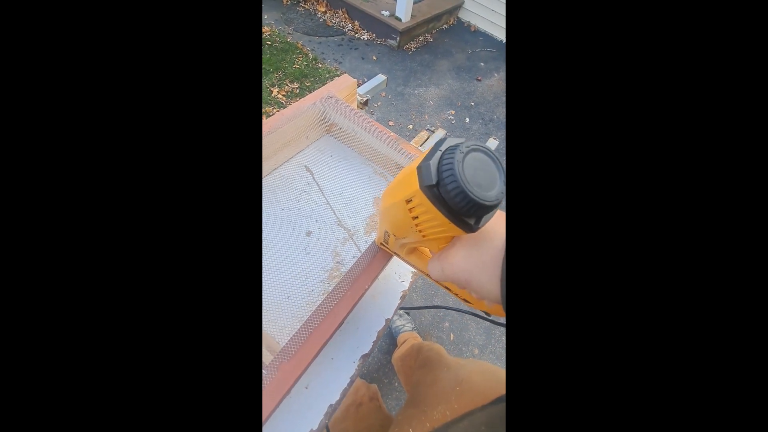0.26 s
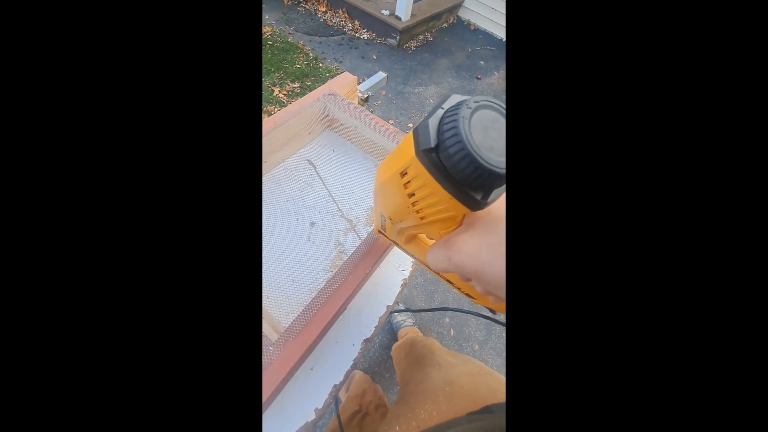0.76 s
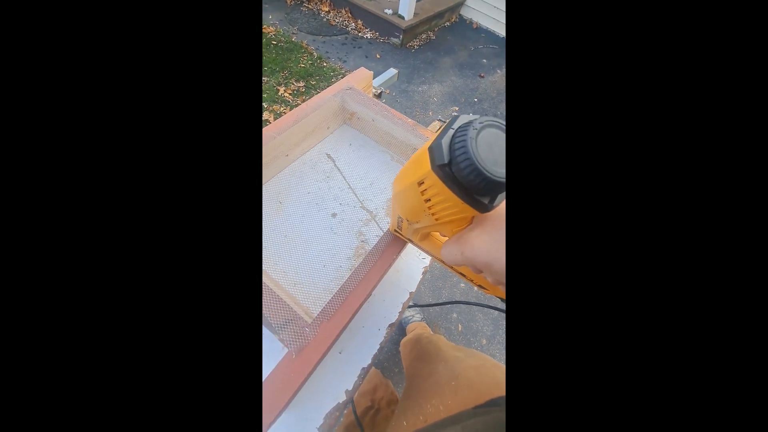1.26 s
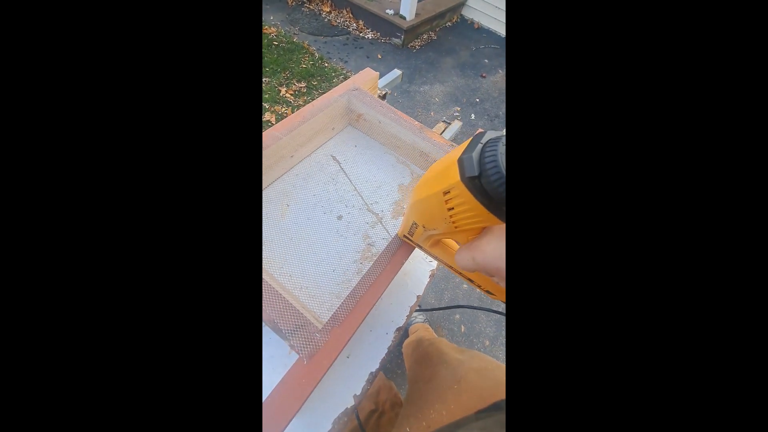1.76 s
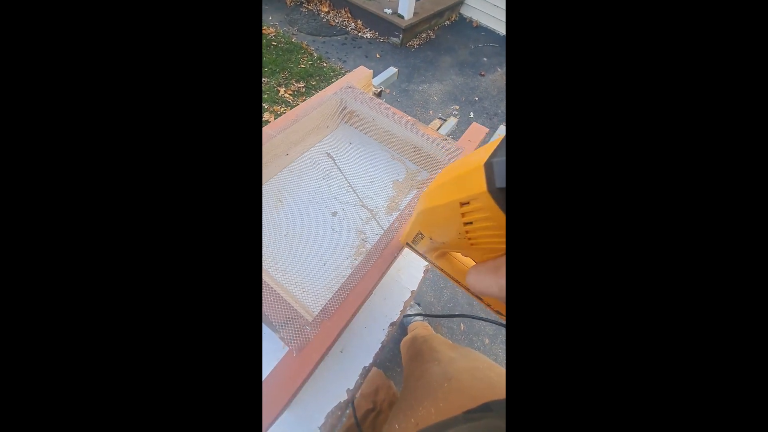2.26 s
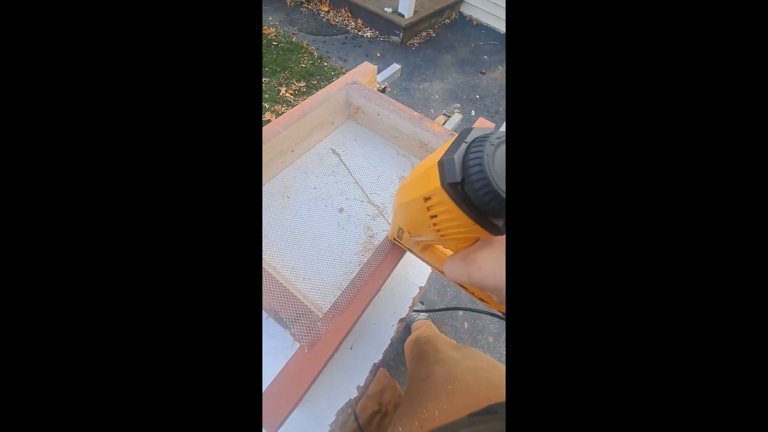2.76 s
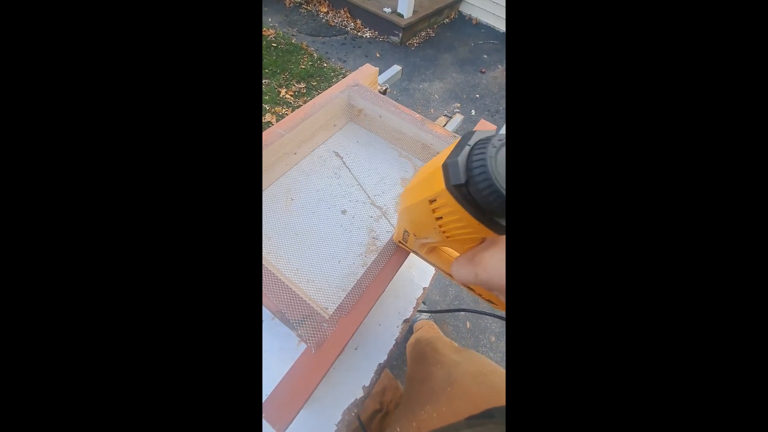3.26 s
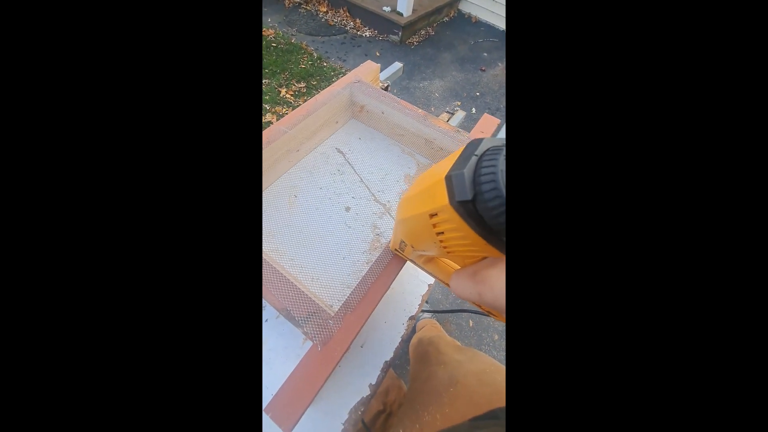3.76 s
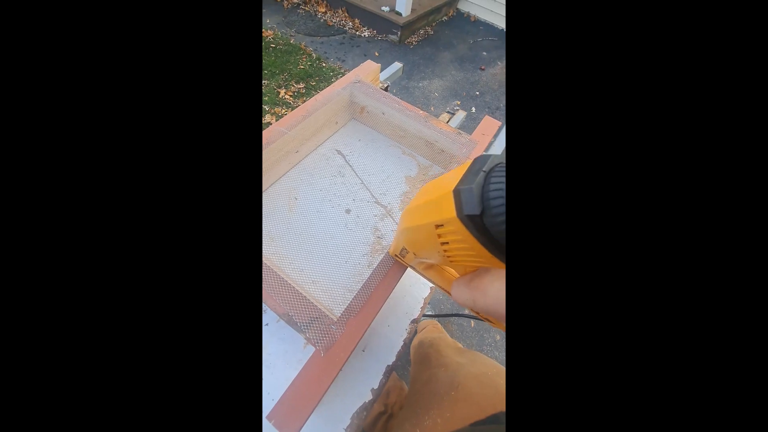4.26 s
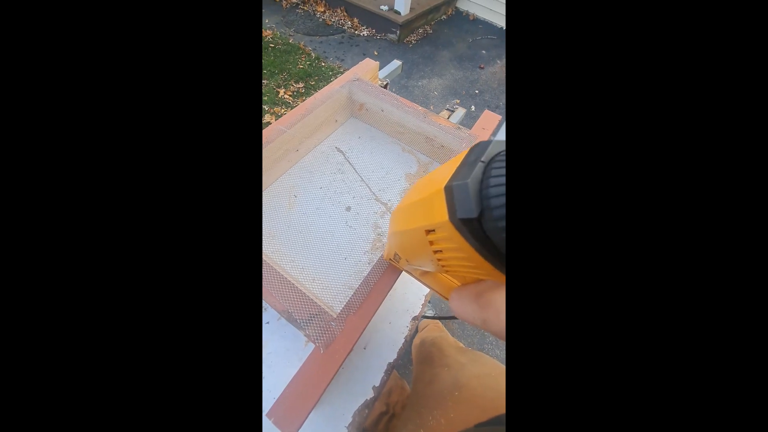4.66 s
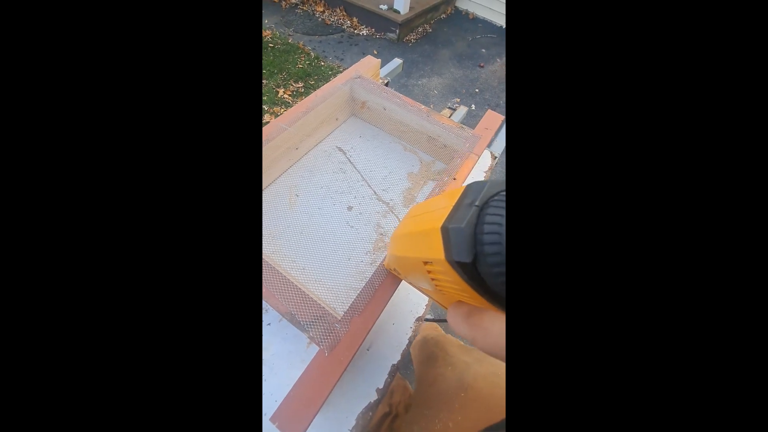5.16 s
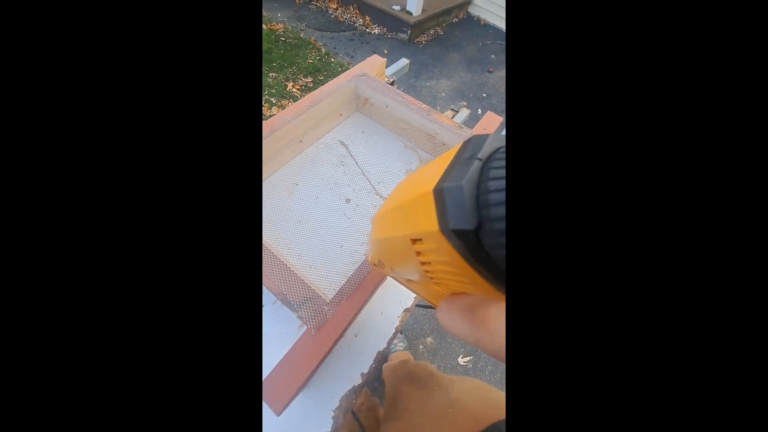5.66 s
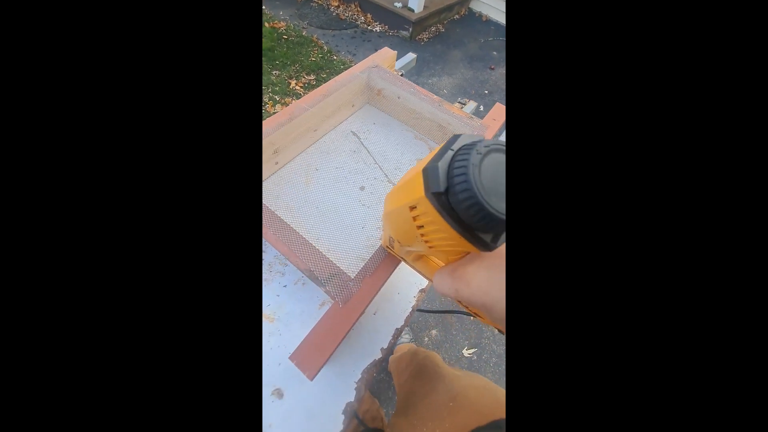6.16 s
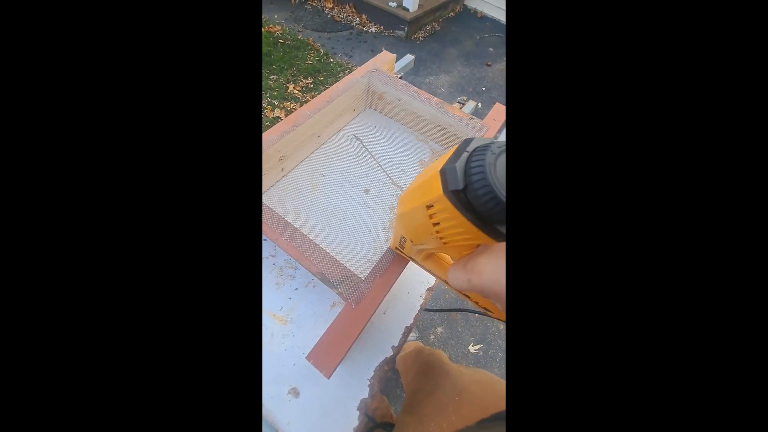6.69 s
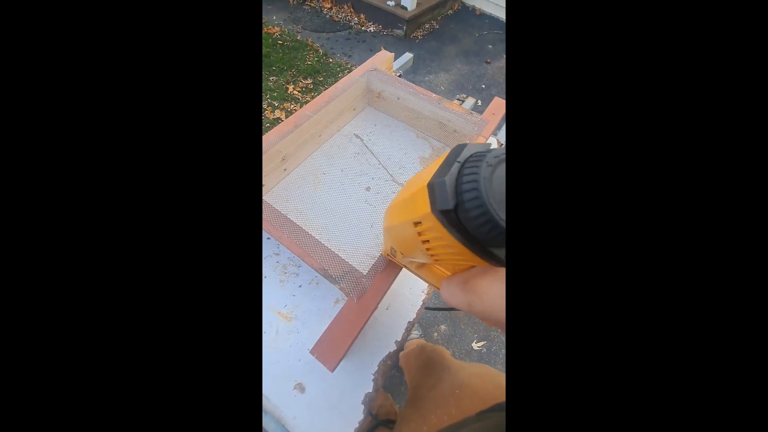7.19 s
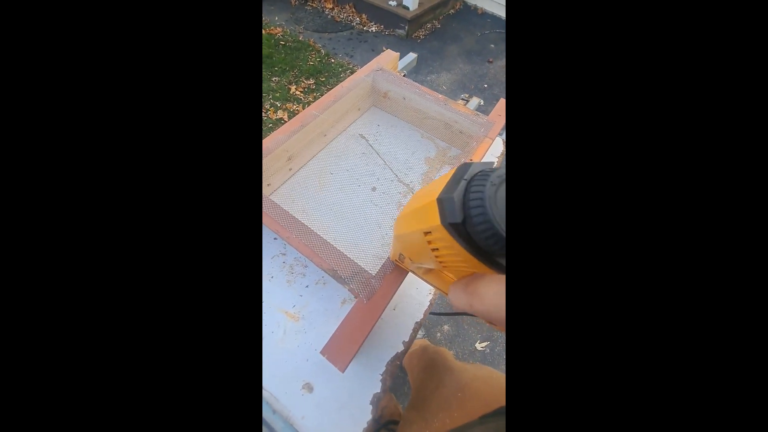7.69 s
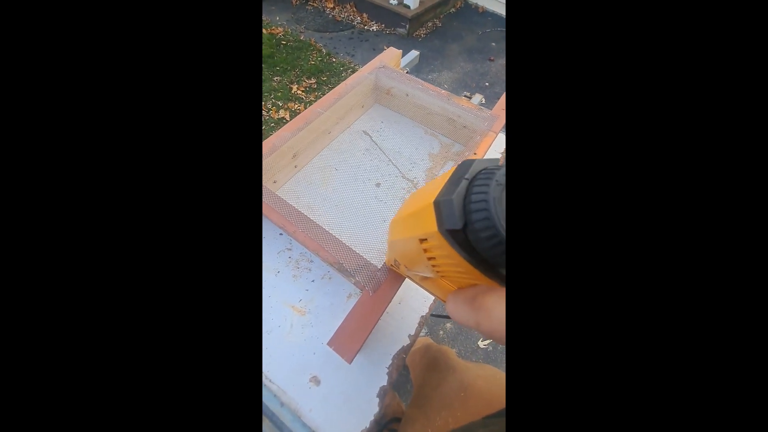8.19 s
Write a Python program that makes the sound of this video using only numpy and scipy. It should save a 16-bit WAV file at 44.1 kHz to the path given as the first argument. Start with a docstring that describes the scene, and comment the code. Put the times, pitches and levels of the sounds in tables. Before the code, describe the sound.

Seven loud metallic staple shots into wood, with small clicks, hollow bouncing thuds and a short outdoor echo.

```python
"""Outdoors, on a folding table, an electric stapler fires seven times into a wooden frame.
Each time its plunger (the rod that pushes the staple) speeds up, drives the staple, slams back and
bounces twice, and its spring hisses on. The frame booms, jumps and thuds back down; house walls echo.
Trigger ticks, the tool rubbing on wire mesh and a low outdoor drone fill the gaps."""
import sys
import numpy as np
from scipy import signal
from scipy.fft import rfft, irfft, next_fast_len
from scipy.io import wavfile
from scipy.ndimage import uniform_filter1d, map_coordinates

SR = 44100
rng = np.random.default_rng(int(sys.argv[2]) if len(sys.argv) > 2 else 0)


def master_out(mix):
    """Clip the mix to full scale and print it as 16-bit PCM to the path in sys.argv[1]."""
    frames = np.transpose(np.atleast_2d(mix))
    ceiling = np.clip(frames, -1, 1)
    pcm = np.round(ceiling * 32767).astype(np.int16)
    wavfile.write(sys.argv[1], SR, pcm)


N = 371763

# each staple driven in: t/s, steel level/dB, boom level/dB, wait until the second rebound/ms
SHOTS = [(0.3425, -1.5, -4, 37.2), (1.8081, -1.5, -3.5, 40.3), (3.1076, -1.95, -5, 38),
         (4.2072, -0.63, -1.5, 38.3), (5.2563, -1.5, -5, 37.4), (6.6063, -3, -3, 38.6),
         (7.6217, -2.5, -5, 37.9)]
FIRST_REBOUND_S = 0.0113  # after the staple is driven


def amp(db):
    """Turns decibels into a factor to multiply by."""
    return 10 ** (np.asarray(db) / 20)


def unit(x):
    """Scales a signal to an average power of 1."""
    return x / np.sqrt(np.mean(x ** 2) + 1e-20)


def along(points, hz):
    """Reads a curve through (frequency, value) points, with octaves evenly spaced."""
    f, v = np.transpose(points)
    return np.interp(np.log(hz + 1), np.log(f + 1), v)


def curve(points):
    """Turns (frequency, decibels) points into a function that gives the gain at any frequency."""
    return lambda hz: amp(along(points, hz))


def filtered(x, response):
    """Multiplies each frequency in x by response(frequency)."""
    size = next_fast_len(x.shape[-1] + 8192)
    hz = np.fft.rfftfreq(size, 1 / SR)
    return irfft(rfft(x, size) * response(hz), size)[..., :x.shape[-1]]


def add(track, s, sound):
    """Mixes a sound into a track, starting at s seconds."""
    part = track[..., max(round(s * SR), 0):][..., :sound.shape[-1]]
    part += sound[..., :part.shape[-1]]


def wobble(rate):
    """A smooth curve through `rate` random values a second."""
    return map_coordinates(rng.standard_normal(int(N * rate / SR) + 4), [np.arange(N) * rate / SR])


def rush(gain, patchy_db):
    """Stereo noise shaped by gain(frequency), with random louder and softer patches."""
    # how alike left and right are: f/Hz, likeness (1 = the same)
    likeness = [(60, 0.82), (180, 1), (550, -0.063), (1650, -0.33), (4970, -0.39), (15000, 0.99)]
    spectrum = signal.stft(rng.standard_normal((2, N)), nperseg=512)[2]
    patches = uniform_filter1d(rng.standard_normal(spectrum.shape[1:]), 4, axis=0)
    patches = uniform_filter1d(patches, 8, axis=1)
    pair = signal.istft(spectrum * amp(patchy_db * unit(patches)), nperseg=512)[1][:, :N]
    turn = lambda hz: np.arccos(np.clip(along(likeness, hz), -1, 1)) / 2
    mid, side = filtered(pair, lambda hz: gain(hz) * [np.cos(turn(hz)), np.sin(turn(hz))])
    return unit(np.array([mid + side, mid - side]))


def shot_swell(peak_db, rise_s, fade_db_per_s):
    """A gain that swells after every shot and fades."""
    after = np.arange(N) / SR - np.array(SHOTS)[:, :1]
    rising = np.clip(after / rise_s, 0, 1) ** 2
    fading = amp(peak_db - fade_db_per_s * np.clip(after - rise_s, 0, None))
    return (rising * fading).sum(axis=0)


def background():
    """A rumble, a drone with a brighter upper edge, and fuzzy tones that swell with the drone."""
    # loudness between shots: t/s, rumble level/dB, drone level/dB, edge level/dB
    band_levels = [(0.0, -50, -68.5, -83), (0.3, -61, -60, -82.5), (1.1, -64.5, -67.5, -90.5),
                   (1.31, -60, -63, -83.5), (1.8, -59.5, -61.5, -82), (2.44, -65, -69, -80.5),
                   (2.77, -71.5, -68, -79), (3.54, -75, -73, -89), (4.0, -61, -71, -79.5),
                   (4.67, -63, -67.5, -78), (5.261, -57.5, -69.5, -80.5), (5.84, -72, -68, -77),
                   (6.57, -65, -63, -76.5), (7.068, -69, -75.5, -95.5), (7.39, -69, -71.5, -91.5),
                   (7.63, -60, -67, -80.5), (8.05, -68.5, -83, -100.5), (8.43, -67, -73, -93.5)]
    # swell of these three bands after a shot: peak level/dB, rise/s, fade/(dB per s)
    swells = [(-47, .2, 90), (-53.5, 0.12, 58), (-69, 0.095, 69.5)]
    # tone colour of each band: f/Hz, level/dB
    rumble_colour = [(12, -48.5), (20, -29), (43, 4.5), (86, -16), (134, -4.5), (226, -16.5), (300, -21),
                     (390, -51.5), (660, -120)]
    drone_colour = [(120, -27), (200, -1), (300, -14.5), (345, -3.5), (416, -3), (437, -5.5), (695, -3),
                    (1400, -18.5), (1820, -53), (3080, -120)]
    edge_colour = [(900, -39), (1200, -1), (1700, -4.5), (2300, -6), (2600, -30.5), (4000, -59.5)]
    # wavering tones in the drone: f/Hz, half-width/Hz, level/dB
    hum_tones = [(462, 20, -2.5), (738, 2, -1), (1500, 1, -16)]
    t = np.arange(N) / SR
    times, *levels = np.transpose(band_levels)
    low, mid, high = (amp(np.interp(t, times, db)) + shot_swell(*row) for db, row in zip(levels, swells))
    rumble = low * amp(2.4 * wobble(5.8)) * rush(curve(rumble_colour), patchy_db=0)
    drone = mid * amp(2.4 * wobble(6.7)) * rush(curve(drone_colour), patchy_db=2.5)
    edge = high * rush(curve(edge_colour), patchy_db=1.9)
    tones = lambda hz: sum(amp(db) / (1 + ((hz - pitch) / width) ** 2) for pitch, width, db in hum_tones)
    hum = mid ** 0.86 * amp(-19 + 2 * wobble(1.5)) * rush(tones, patchy_db=0)
    return rumble + drone + edge + hum


def microphone_hiss():
    """The microphone's own faint noise."""
    # tone colour of the hiss: f/Hz, level/dB
    hiss_colour = [(1500, -30), (2500, -2.5), (5000, -1.5), (8000, 1.5), (10500, -6), (13000, 0),
                   (16500, -8.5)]
    return amp(-93.5) * rush(curve(hiss_colour), patchy_db=2)


def frame_boom(contact_ms, deep_db, damping, chatter_db):
    """A push makes the frame ring at its own pitches and chatter unevenly on the table."""
    # the frame's pitches: f/Hz, level/dB, time to fade by 60 dB when damping is 1/s
    frame_modes = [(57.7, -13, 0.16), (79, -14.5, 0.24), (120.9, -11.5, 0.16), (143.1, -12, 0.15),
                   (170, -7.5, .16), (217.9, 0, 0.079), (272.2, 3, 0.062), (305, -1.5, 0.075),
                   (358.8, -4, .06), (419.6, -6.5, 0.068), (477, -9, 0.044), (564, -17, 0.033),
                   (750, -15.5, 0.1)]
    t = np.arange(SR // 2) / SR
    hz, db, t60 = np.transpose(frame_modes)[:, :, None]
    db = db + deep_db * (hz < 155) + 1.5 * rng.standard_normal(hz.shape)
    stereo_blend = amp((2 + 2.7 * (hz.T < 100)) * rng.standard_normal((2, len(hz))))
    ring = stereo_blend @ (amp(db - 60 * damping * t / t60) * np.sin(2 * np.pi * hz * t))
    ring *= 1 - np.exp(-t * 1000 / abs(contact_ms * 1.2))  # the boards take a moment to swing out
    chatter_s = 0.004 + 0.055 * rng.random(9)
    strengths = amp(chatter_db - 60 * chatter_s / 0.59) * rng.standard_normal(9)
    blows = np.bincount((chatter_s * SR).astype(int), strengths)
    blows[0] = 1  # the main blow
    push = np.convolve(blows, np.hanning(max(round(contact_ms * SR / 1000), 3)))
    ring = signal.fftconvolve(ring, push[None], axes=1)[:, :len(t)]
    return ring / np.max(np.abs(ring[:, :SR // 100]))


def plastic_knock(hz, cycles):
    """Struck hard plastic: a tone that swells within one swing and dies after `cycles` swings."""
    swings = np.arange(SR // 50) / SR * hz
    return np.sin(2 * np.pi * swings) * amp(-60 * swings / cycles) * (1 - np.exp(-swings / 0.45))


def table_thuds():
    """Frame and tool land with a short rap and a low boom that the table damps."""
    # landings on the table: t/s, level/dB
    landings = [(0.042, -48), (0.106, -43), (0.587, -15), (0.673, -18.5), (0.769, -28.5), (0.801, -23),
                (1.296, -39), (1.421, -39.5), (2.014, -31), (2.065, -15), (2.143, -28.5), (2.218, -21),
                (2.306, -28.5), (2.349, -33), (2.862, -30.5), (2.93, -42.5), (3.323, -15.5), (3.393, -23),
                (3.439, -31), (3.948, -34), (3.999, -38.5), (4.421, -14.5), (4.495, -18.5), (4.559, -30),
                (4.861, -36), (4.978, -29.5), (5.035, -33), (5.465, -15.5), (5.539, -17.5), (5.605, -25.5),
                (6.057, -43.5), (6.216, -43.5), (6.799, -14.5), (6.872, -19), (6.94, -48), (7.427, -42.5),
                (7.48, -46.5), (7.802, -17.5), (7.878, -23), (7.949, -35), (8.384, -41)]
    out = np.zeros((2, N))
    for s, db in landings:
        contact_ms, deep_db = 2.2 - 0.0868 * db, -3.5 - 0.18 * db  # weak landings are softer and deeper
        add(out, s + 0.0015, -amp(db) * frame_boom(contact_ms, deep_db, damping=2.1, chatter_db=-14.5))
        rap_hz = 370 * amp(rng.standard_normal())
        add(out, s + 0.0012, -amp(db - 8) * plastic_knock(rap_hz, cycles=6))
    return out


def mesh_scrapes():
    """Tool and hand rub on wire mesh: gritty noise that starts quickly and trails off."""
    # each rub: t/s, level/dB, length/s
    strokes = [(0.063, -68.5, 0.65), (0.607, -64.5, 0.15), (0.712, -68, 0.057), (0.981, -70, 0.05),
               (1.267, -59.5, 0.066), (2.194, -59.5, 0.055), (2.28, -67, 0.074), (2.672, -70.5, 0.078),
               (2.811, -72, 0.17), (3.043, -65.5, 0.05), (3.354, -72.5, 0.14), (3.755, -66, 0.095),
               (4.453, -72, 0.27), (4.822, -68.5, 0.082), (5.519, -64.5, 0.22), (5.646, -68.5, 0.087),
               (6.023, -65.5, 0.094), (6.462, -72.5, 0.075), (6.816, -71, 0.17), (7.281, -67, 0.044),
               (7.404, -73, 0.064), (7.83, -73.5, 0.071), (8.262, -79.5, .06), (8.374, -79.5, 0.046)]
    # tone colour of the rubbing: f/Hz, level/dB
    rub_colour = [(530, -31.5), (900, 3), (1130, -7.5), (1410, -3), (4710, -20.5), (6700, -19.5),
                  (10600, -36), (14800, -34), (16500, -46.5)]
    t, level = np.arange(N) / SR, np.zeros(N)
    for s, db, length in strokes:
        age = np.clip((t - s) / length, 0, 4)
        level += amp(db - 6.9 * age ** 1.3) * (1 - np.exp(-age / 0.1)) * (age < 4)
    grit = amp(2 * wobble(90))
    return level * grit * rush(curve(rub_colour), patchy_db=2.5)


def steel_clash(rise_s, t60, rattle_db, rattle_t60, alike):
    """Steel hits steel and loose parts rattle; each t60 is the seconds taken to fade by 60 dB."""
    t = np.arange(SR // 4) / SR
    rising = (1 - np.exp(-t / rise_s)) ** 2
    fading = amp(-60 * t / t60) + amp(rattle_db - 60 * t / rattle_t60)
    both_sides, each_side = rng.standard_normal(len(t)), rng.standard_normal((2, len(t)))
    return rising * fading * (np.sqrt(alike) * both_sides + np.sqrt(1 - alike) * each_side)


def trigger_ticks():
    """Trigger, switch and spring tick: tiny clashes that each make contact twice."""
    # each tick: t/s, level/dB, ringing f/Hz
    tick_list = [(0.2694, -61.5, 2150), (.33, -50, 5880), (0.4838, -43, 2410), (0.5402, -46.5, 6600),
                 (0.5531, -39, 2690), (0.5964, -50.5, 2095), (0.7644, -56, 2185), (1.3044, -50.5, 2040),
                 (1.4194, -59.5, 2200), (1.793, -51, 6500), (1.9619, -41.5, 2540), (2.0073, -35, 2880),
                 (2.0388, -38, 2970), (2.0747, -44.5, 2040), (2.2044, -49, 2840), (2.8065, -55, 6570),
                 (3.035, -48.5, 2080), (3.087, -53, 4960), (3.241, -40, 2015), (3.2989, -35, 3000),
                 (3.3244, -54.5, 1996), (3.911, -58, 6500), (4.1537, -57.5, 2000), (4.188, -62, 5020),
                 (4.3465, -40, 2260), (4.3929, -47, 2074), (4.4144, -40.5, 2670), (4.9292, -55.5, 7500),
                 (5.2034, -62, 2100), (5.247, -51.5, 5000), (5.401, -48, 9000), (5.4151, -40.5, 2323),
                 (5.4595, -32.5, 2720), (5.474, -48, 6500), (5.5404, -56.5, 2050), (5.618, -58, 6500),
                 (5.8057, -53.5, 2720), (6.1436, -64.5, 6750), (6.582, -51.5, 6000), (6.7496, -38.5, 2570),
                 (6.7815, -37.5, 2128), (6.9844, -64, 3250), (7.3731, -58.5, 7530), (7.603, -58.5, 9200),
                 (7.7912, -35.5, 2130), (7.8889, -56, 2110), (8.3603, -62, 6700)]
    out = np.zeros((2, N))
    for s, db, hz in tick_list:
        click = steel_clash(rise_s=0.0004, t60=0.009, rattle_db=-41.5, rattle_t60=0.03, alike=0.13)
        second_contact = amp(-3) * np.roll(click, round(0.003 * SR), axis=1)[::-1]
        ring = lambda f: 0.7j * f / hz / (1 + 1j * f / hz / 2.8 - (f / hz) ** 2)
        treble = lambda f: 0.73 * (f > 900) / (1 + f / 16000)
        add(out, s, amp(db) * filtered(click + second_contact, lambda f: ring(f) + treble(f)))
    return out


def plunger_slide(track, hit_s, db, rise_db_per_s):
    """Adds the sliding noise before a hit, louder as the plunger gains speed."""
    time_left = np.arange(round(0.008 * SR))[::-1] / SR
    noise = rng.standard_normal((2, len(time_left)))
    add(track, hit_s - time_left[0], amp(db - rise_db_per_s * time_left) * noise)


def stapler_shots():
    """The plunger drives the staple and rebounds three times; steel, plastic and frame sound each time."""
    # rebounds, compared with the drive: steel level/dB, knock level/dB, boom level/dB, knock f/Hz
    rebounds = [(-2, 7, -26, 2160), (-8, 1, -27, 1150), (-24, -12, -23, 1400)]
    # tone colour of the steel: f/Hz, level/dB
    steel_colour = [(710, -35), (1200, -1.5), (2490, -6.5), (3660, -5.5), (5890, -14.5), (6720, -7.5),
                    (9260, -11), (13300, -5.5), (15700, -12), (16800, -36)]
    steel, body = np.zeros((2, N)), np.zeros((2, N))
    for s, db, boom_db, second_ms in SHOTS:
        plunger_slide(steel, s, db - 24.5, rise_db_per_s=4800)
        clash = steel_clash(rise_s=0.00057, t60=0.011, rattle_db=-32, rattle_t60=0.04, alike=0.16)
        add(steel, s, amp(db) * clash)
        add(body, s + 0.0018, amp(boom_db - 0.3) * plastic_knock(hz=880, cycles=11))
        boom = frame_boom(contact_ms=0.99, deep_db=-9, damping=0.93, chatter_db=-10.5)
        add(body, s + 0.0024, amp(boom_db) * boom)
        second_s = s + second_ms / 1000
        rebound_times = [s + FIRST_REBOUND_S, second_s, second_s + 0.0196]
        for at, (steel_db, knock_db, low_db, hz) in zip(rebound_times, rebounds):
            # the plunger's end stop is struck first
            add(body, at - 0.0004, amp(boom_db + knock_db) * plastic_knock(hz, cycles=3.4))
            plunger_slide(steel, at, db + steel_db - 27, rise_db_per_s=3400)
            rise_s = 1.5 / hz  # the duller the knock, the later the staple holder shakes
            clash = steel_clash(rise_s, t60=0.013, rattle_db=-34, rattle_t60=0.15, alike=0.21)
            add(steel, at - rise_s / 4, amp(db + steel_db) * clash)
            boom = frame_boom(contact_ms=1.9, deep_db=-4, damping=1.2, chatter_db=-6)
            add(body, at, amp(boom_db + low_db) * boom)
    colour = curve(steel_colour)
    treble_gain = np.sqrt(np.mean(colour(np.linspace(3000, 16000, num=200)) ** 2))
    return filtered(steel, colour) / treble_gain + body


def spring_hiss():
    """The return spring gives a bright, grainy hiss that outlasts the rattle of each shot."""
    centre_hz, width_hz, t60 = 13000, 2400, 0.6
    out, t = np.zeros((2, N)), np.arange(SR // 3) / SR
    for s, db, *_ in SHOTS:
        add(out, s + FIRST_REBOUND_S, amp(db - 50 - 60 * t / t60) * rng.standard_normal((2, len(t))))
    grainy = out * amp(2.5 * wobble(150))
    return filtered(grainy, lambda hz: np.exp(-((hz - centre_hz) / width_hz) ** 2 / 2))


def wall_echo(x):
    """House walls send back a duller echo; every half second of sound gets its own random tail."""
    # how long the echo lasts: f/Hz, time to fade by 60 dB/s
    fade_times = [(150, 0.49), (500, 0.69), (1500, 0.56), (4000, 0.43), (10000, 0.24), (16000, 0.082)]
    out = np.zeros((2, N))
    for start in range(0, N, SR // 2):
        hz, t, spectrum = signal.stft(rng.standard_normal((2, SR * 3 // 4)), SR, nperseg=256)
        fading = amp(-60 * t / along(fade_times, hz)[:, None])
        tail = signal.istft(spectrum * fading, SR, nperseg=256)[1]
        part = x[None, start:start + SR // 2]
        add(out, start / SR + 0.006, signal.fftconvolve(part, tail / np.linalg.norm(tail[0]), axes=1))
    return filtered(amp(-17.5) * out, lambda hz: 1 / (1 + hz / 12000))


def microphone_shade(x):
    """The housing shades the two microphone openings unequally; on the right, treble is late and dips."""
    # left-right balance of the tool: f/Hz, left over right/dB
    tool_balance = [(60, -1), (92, -1), (140, 1), (210, -2.5), (330, -3.5), (500, -9.5), (770, -9.5),
                    (1170, -6), (1790, 4), (2740, 8), (4190, 4), (6410, 12.5), (9810, 4.5), (15000, -2.5)]
    half = lambda hz: amp(along(tool_balance, hz) / 2)
    late = lambda hz: np.exp(-2j * np.pi * hz * 0.00045 * np.clip(hz / 1300, 0, 1))
    notch = lambda hz: 1 - 1.1 / (1 + ((hz - 9100) / 700) ** 2)
    return filtered(x, lambda hz: np.array([half(hz), late(hz) * notch(hz) / half(hz)]))


def scene():
    """The stapling close by and its echo, over quiet scrapes and the background."""
    # left-right balance of the quiet sounds: f/Hz, left over right/dB
    quiet_balance = [(60, 0.0), (180, -1), (550, -11), (1650, 0.5), (4970, 10.5), (15000, 0.5)]
    work = stapler_shots() + trigger_ticks() + spring_hiss() + table_thuds()
    echo = wall_echo(work.mean(axis=0))
    quiet = mesh_scrapes() + background() + microphone_hiss()
    quiet = filtered(quiet, lambda hz: amp(along(quiet_balance, hz) * [[0.5], [-0.5]]))
    return microphone_shade(work + echo) + quiet


def record(dry):
    """The microphone weakens deep bass, rounds off the loudest peaks and cuts the highest treble."""
    bass_hz, top_hz = 60, 16900
    thinned = filtered(dry, lambda hz: (1j * hz / (1j * hz + bass_hz)) ** 2)
    rounded = thinned / (1 + np.abs(thinned) ** 8) ** (1 / 8)
    return filtered(rounded, lambda hz: hz < top_hz)


dry = scene()
out = record(dry)
master_out(out)
```